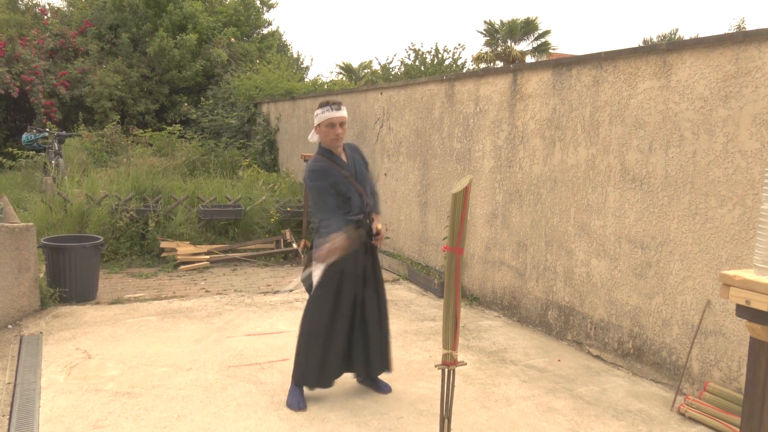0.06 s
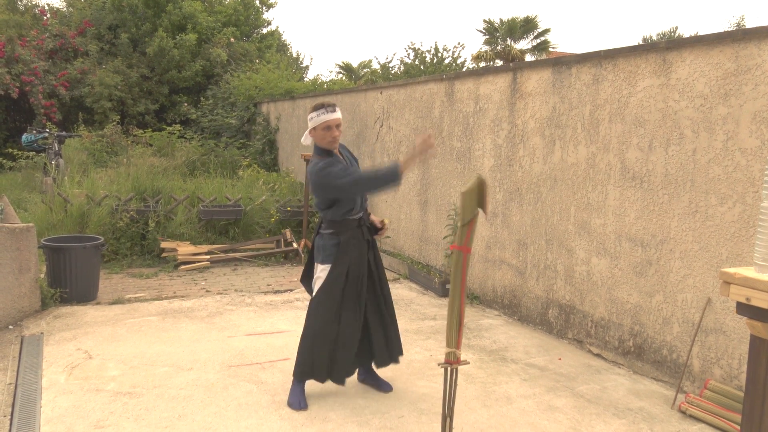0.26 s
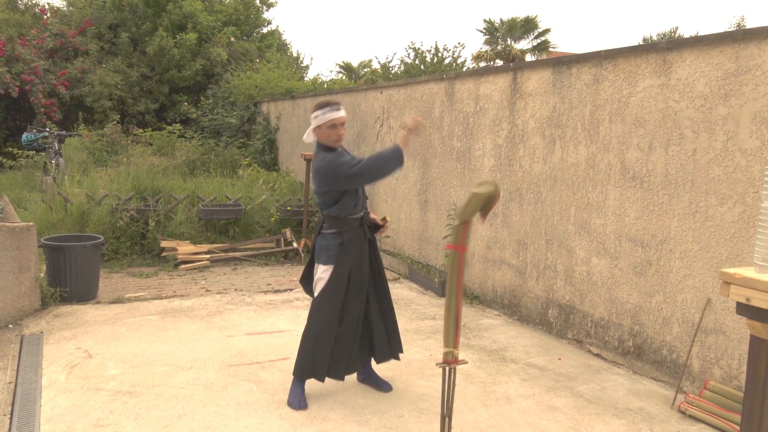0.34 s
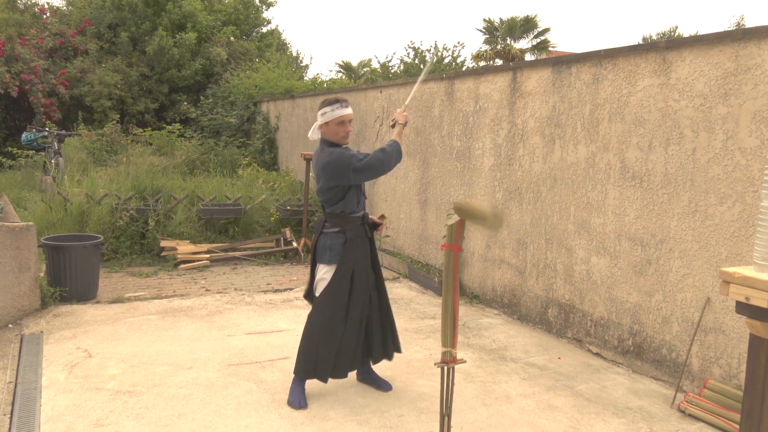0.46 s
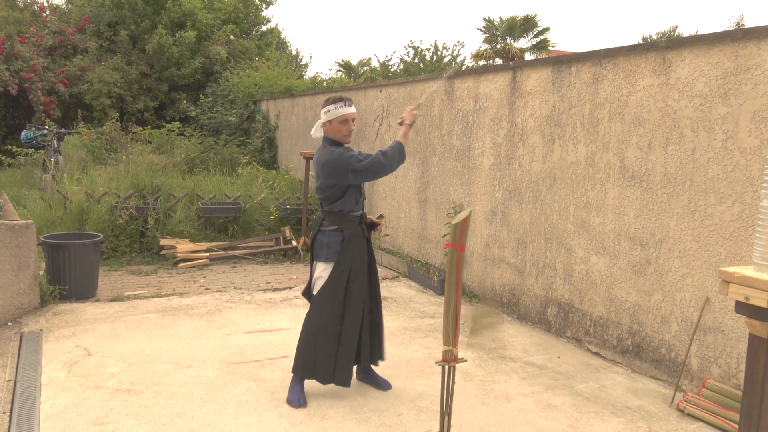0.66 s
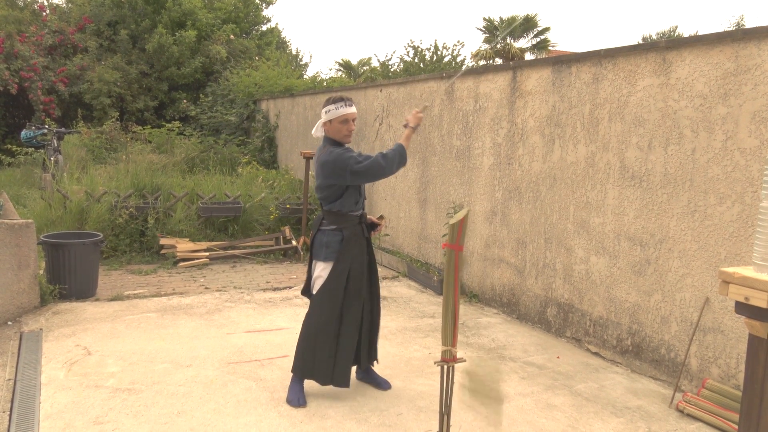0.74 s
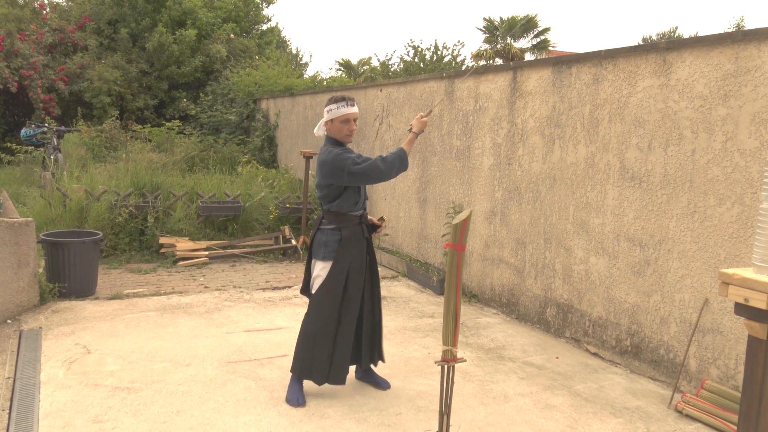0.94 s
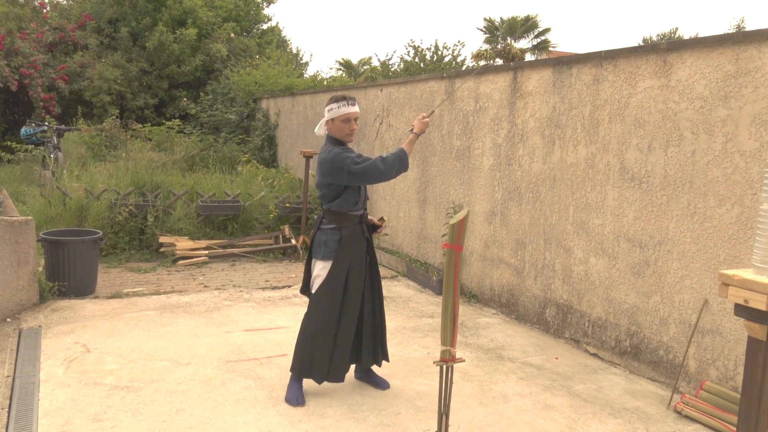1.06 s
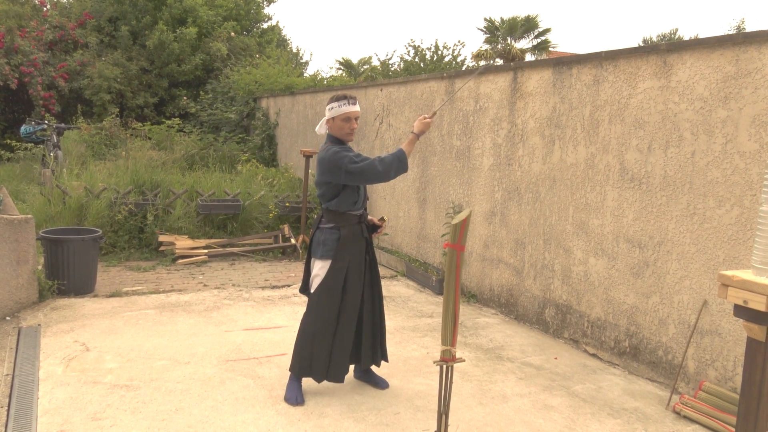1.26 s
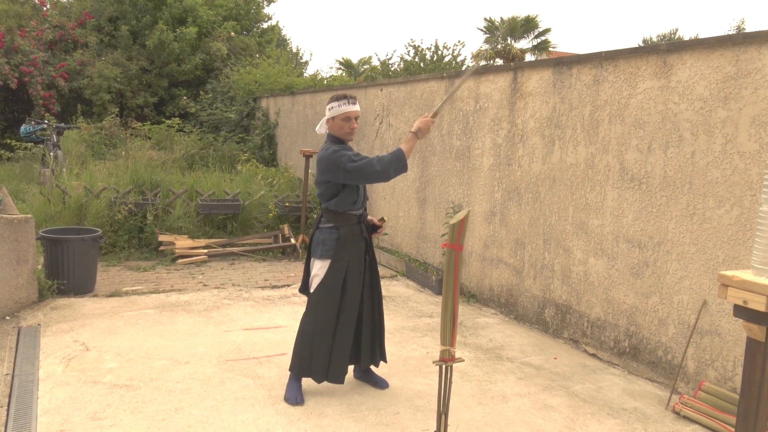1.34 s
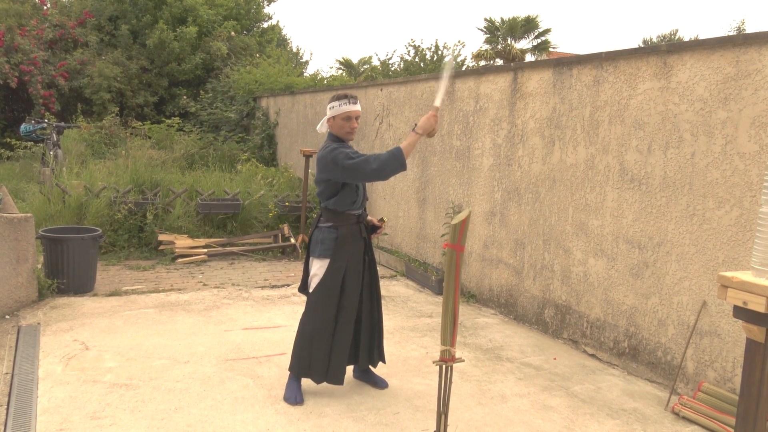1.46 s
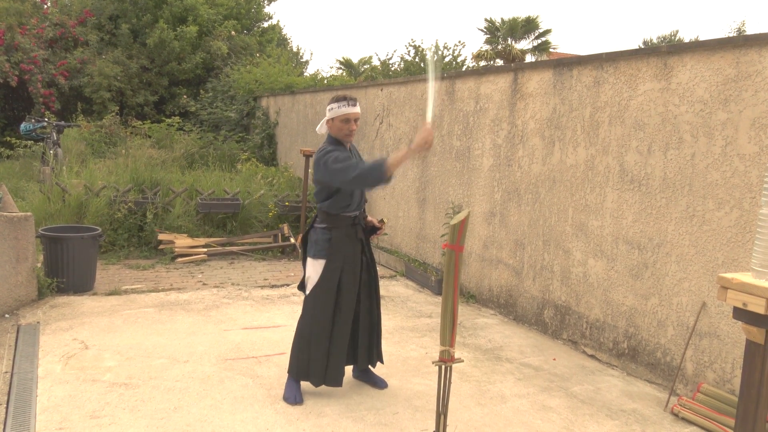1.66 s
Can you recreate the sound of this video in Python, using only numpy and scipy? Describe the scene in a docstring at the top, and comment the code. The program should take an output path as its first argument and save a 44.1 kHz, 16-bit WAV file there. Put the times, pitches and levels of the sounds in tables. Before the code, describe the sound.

A sword swishes briefly and cuts through a bamboo pole with one sharp crack. The severed piece lands on concrete with hollow knocks and a short gritty roll, over faint outdoor noise in a walled yard.

```python
"""A sword cuts bamboo

A blade swishes through the air, splits a standing bamboo pole with one sharp crack and rings thinly.
After a faint tick the cut piece lands on concrete, knocks with its other end, rolls and tips over.
Fracture and impact give broadband noise and excite the damped modes of the hollow bamboo.
The yard's walls reflect each sound over steady outdoor noise and a faint hum."""
import sys
import numpy as np
from scipy import signal
from scipy.fft import rfft, irfft
from scipy.io import wavfile
from scipy.ndimage import uniform_filter1d

SR = 44100
rng = np.random.default_rng(int(sys.argv[2]) if len(sys.argv) > 2 else 0)


def to_wav(sig):
    """Store sig (one row per channel, or 1-D mono) as 16-bit WAV at the path in sys.argv[1].

    Samples outside -1..1 are clipped; the rate is SR.
    """
    pcm = np.clip(np.atleast_2d(sig), -1, 1) * 32767
    pcm = np.round(pcm).astype(np.int16)
    wavfile.write(sys.argv[1], SR, pcm.T)  # frames by channels


N = 74970
T = np.arange(N) / SR

# distant outdoor noise: f/Hz, relative spectral level/dB
OUTDOOR_SPECTRUM = [(25, -21.5), (60, -7), (95, -8), (125, -2), (155, -16), (215, -6), (265, -10),
                    (350, -7), (550, -8.5), (900, -9.5), (1550, -14.5), (2300, -16), (3400, -16.5),
                    (4200, -24), (6300, -27), (9500, -31.5), (12000, -40.5), (16000, -40)]
# faint steady tones: f/Hz, level/dB, bandwidth/Hz
HUM_TONES = [(121, -57, 8.9), (94.1, -61, 8), (215, -62, 11), (1825, -60.5, 17)]
# stages in which the pole gives way: t/s, duration/s, level/dB
FRACTURES = [(0.226, 0.0012, -16), (0.2292, 0.0028, -12.5), (0.2408, 0.00116, -28.5), (0.247, .001, -30.5)]
# tearing fibres: f/Hz, relative spectral level/dB
FIBRE_SPECTRUM = [(60, -38), (160, -18), (280, -1), (480, -5), (850, -2), (1500, -5), (3400, -2.5),
                  (5200, -5), (6700, 0), (9500, -3), (11500, -9.5), (12500, -16.5), (16000, -26)]
# modes of the standing pole: f/Hz, relative level/dB, T60/s
POLE_MODES = [(291, -10.5, 0.048), (344.6, -11.5, 0.08), (583, -14.5, 0.078), (822, -6.5, .035),
              (1080, -13, 0.032), (1360, -12.5, 0.045), (1960, -4.5, 0.019), (2720, -2, .016),
              (2960, -5, .016), (3530, -8, 0.035), (6180, 0, 0.0109), (6560, 7.5, 0.012),
              (8380, -5, 0.0092), (8670, 3, 0.018), (9830, -1.5, 0.0165)]
# ground contacts: t/s, duration/s, level/dB, high-pass f/Hz, low-pass f/Hz, favoured f/Hz, ring level/dB
CONTACTS = [(0.9193, 0.0045, -26.5, 200, 11570, 3000, -24), (0.9251, 0.0059, -24, 302, 10160, 1416, -3),
            (0.9335, 0.0022, -29, 300, 8900, 3330, -5.5), (0.963, 0.0086, -37, 300, 6900, 3560, -3),
            (1.0044, 0.00167, -37.5, 1800, 6500, 2860, -7), (1.0099, 0.0042, -27.5, 1770, 5370, 2140, 2),
            (1.026, 0.00225, -56.5, 2000, 9000, 4600, -17), (1.051, 0.011, -41, 1500, 4500, 3494, -4),
            (1.2025, 0.0058, -37.5, 2000, 10850, 3440, -3.5), (1.2102, 0.0051, -36, 800, 4820, 2900, -11.5)]
# modes of the cut piece, a short hollow tube: f/Hz, relative level/dB, T60/s
TUBE_MODES = [(600, -7, 0.059), (1406.3, -9.5, 0.047), (2100, -5, .024), (2480, -4, .022),
              (2780, -4, 0.019), (3000, -3.5, 0.029), (3450, -6, .02), (4590, 5.5, 0.013),
              (6000, -3.5, 0.021), (6580, -4.5, 0.021), (7320, -2, 0.017), (9200, -15, .017)]
# scraped grit: f/Hz, relative spectral level/dB
GRIT_SPECTRUM = [(80, -14), (300, 1.5), (600, -0.5), (1200, -0.5), (1900, -1), (3200, 1), (5500, -5),
                 (9000, -3.5), (11500, -7.5), (13000, -17), (16000, -19.5)]
# loudness of the rolling: t/s, level/dB
ROLL_ENVELOPE = [(0.94, -43.5), (1.03, -54), (1.11, -42.5), (1.17, -46), (1.24, -46), (1.31, -56.5),
                 (1.45, -50.5)]
# rasp of the rolling: f/Hz, relative spectral level/dB
RASP_SPECTRUM = [(100, -15), (250, 5), (600, -6), (1200, 4.5), (1900, -2.5), (3300, -2), (4500, -10),
                 (9000, -16.5), (12000, -27), (16000, -44)]
# reflections from the walls: delay/s, level/dB
WALL_ECHOES = [(.0095, -14), (.019, -24), (.038, -22), (.056, -24), (.157, -40)]
# reverberation time of the yard: f/Hz, T60/s
YARD_DECAY = [(200, 0.56), (1400, 0.44), (3700, 0.39), (8000, 0.28), (14000, 0.24)]


def amp(db):
    """Amplitude ratio of a level in decibels."""
    return 10 ** (np.asarray(db) / 20)


def unit_rms(x):
    """Power normalisation to rms 1."""
    return x / np.sqrt(np.mean(x ** 2) + 1e-20)


def equal_energy(x):
    """Energy normalisation of a transient to that of 10 ms at rms 1."""
    return x * np.sqrt(.01 * SR / (np.sum(x ** 2) + 1e-20))


def value_at(table, hz):
    """Interpolation on a logarithmic frequency axis."""
    f, value = np.transpose(table)
    return np.interp(np.log(hz + 1), np.log(f + 1), value)


def add(mix, start_s, sound):
    """Superposition of a delayed sound on the mix."""
    part = mix[round(start_s * SR):][:len(sound)]
    part += sound[:len(part)]


def colour(x, spectrum, size=2048):
    """Minimum-phase filtering: the phase is the Hilbert transform of the log gain."""
    log_gain = np.log(amp(value_at(spectrum, abs(np.fft.fftfreq(size, 1 / SR)))))
    taps = np.fft.ifft(np.exp(np.conj(signal.hilbert(log_gain)))).real
    return signal.fftconvolve(x, taps[:size // 2])[:len(x)]


def lowpass(x, hz):
    """Second-order attenuation of the treble."""
    return signal.lfilter(*signal.butter(2, hz, fs=SR), x)


def noise_band(hz, width_hz):
    """Random modulation spreads a steady or gliding carrier into a band of rms 1."""
    f = np.fft.fftfreq(N, 1 / SR)
    noise = rng.standard_normal(N) + 1j * rng.standard_normal(N)
    modulation = np.fft.ifft(np.fft.fft(noise) / (1 + (2 * f / width_hz) ** 2))
    carrier = np.exp(2j * np.pi * np.cumsum(hz * np.ones(N)) / SR)
    return unit_rms((modulation * carrier).real)


def snaps(per_s, size, spread_db=1.9):
    """Shot noise: independent impulses of random sign and uneven strength."""
    strength = amp(spread_db * np.minimum(rng.exponential(1, size), 4))
    return strength * rng.choice([-1., 1.], size) * (rng.random(size) < per_s / SR)


def burst(length_s, per_s=14000, release_s=.0016, size=8192):
    """Dense shot noise that holds, then decays exponentially."""
    t = np.arange(size) / SR
    return snaps(per_s, size) * np.exp(-np.maximum(t - length_s, 0) / release_s)


def ring(modes, contact_s, detune=.012, size=8192):
    """Damped modes build up from rest during contact; little radiates below the lowest one."""
    t = np.arange(size) / SR
    tone = np.zeros(size)
    for hz, db, t60 in modes:
        detuned_hz = hz * (1 + detune * rng.standard_normal())
        tone += amp(db - 60 * t / t60) * np.sin(2 * np.pi * detuned_hz * t)
    build_up = np.minimum(2 * t / contact_s, 1)
    radiation = signal.butter(2, modes[0][0] / 2, "high", fs=SR)
    return equal_energy(signal.lfilter(*radiation, tone * build_up))


def background(noise_db=-45.5, patch_db=.89):
    """Distant noise, modulated in time and frequency; narrow noise bands form a wavering hum."""
    frames = dict(fs=SR, nperseg=1024, noverlap=768)
    spectra = signal.stft(rng.standard_normal(N), **frames)[2]
    patches = uniform_filter1d(rng.standard_normal(spectra.shape), size=12, axis=0)
    patches = unit_rms(uniform_filter1d(patches, size=14, axis=1))
    noise = signal.istft(spectra * amp(patch_db * patches), **frames)[1][:N]
    gain = amp(value_at(OUTDOOR_SPECTRUM, np.fft.rfftfreq(N, 1 / SR)))
    outdoors = unit_rms(irfft(rfft(noise) * gain, N))
    hum = sum(amp(db) * noise_band(hz, width_hz) for hz, db, width_hz in HUM_TONES)
    return amp(noise_db) * outdoors + hum


def swish(peak_s=.186, rise_s=.025, fall_s=.011, peak_db=-42.5, glide_hz_per_s=6930):
    """Aerodynamic noise of the moving blade: a rising whistle within a broad rush of air."""
    t = T - peak_s
    whistle = noise_band(hz=1050 + glide_hz_per_s * np.clip(t, -.1, .1), width_hz=460)
    rush = amp(-11.5) * noise_band(hz=2765, width_hz=5000)
    envelope = np.exp(-(t / np.where(t < 0, rise_s, fall_s)) ** 2)
    return amp(peak_db) * envelope * (whistle + rush)


def crack(ring_shift_db):
    """Fracture of the near wall, then the far wall, tears fibres and excites the pole's modes."""
    out = np.zeros(N)
    for start_s, length_s, db in FRACTURES:
        fibres = amp(-1) * equal_energy(colour(burst(length_s), FIBRE_SPECTRUM))
        pole = amp(-7 + ring_shift_db) * ring(POLE_MODES, length_s)
        add(out, start_s, amp(db) * (fibres + pole))
    return out


def blade_ring(hz=14060, glide_hz_per_s=3000, t60=.21, rise_s=.055):
    """Free vibration after the cut: one thin tone that glides up as the blade swings on."""
    t = T[:SR // 2]
    envelope = amp(-35 - 60 * t / t60) * np.minimum(t / rise_s, 1) ** 2
    phase = 2 * np.pi * (hz + glide_hz_per_s * t / 2) * t
    out = np.zeros(N)
    add(out, FRACTURES[0][0], envelope * np.sin(phase))
    return out


def tick(start_s=.7445, length_s=.013, db=-46.5):
    """A brief noise transient, heard as a faint tick while the piece falls."""
    click = lowpass(colour(burst(length_s), GRIT_SPECTRUM), hz=5000)
    out = np.zeros(N)
    add(out, start_s, amp(db) * equal_energy(click))
    return out


def knocks(ring_shift_db, favour_db=14.5, favour_octaves=.091):
    """Impact excitation: each contact scrapes grit and rings the modes its position favours."""
    out = np.zeros(N)
    for start_s, length_s, db, highpass_hz, lowpass_hz, favoured_hz, ring_db in CONTACTS:
        modes = []
        for hz, mode_db, t60 in TUBE_MODES:
            closeness = np.exp(-(np.log2(hz / favoured_hz) / favour_octaves) ** 2)
            modes.append((hz, mode_db + favour_db * closeness, t60))
        scrape = equal_energy(colour(burst(length_s), GRIT_SPECTRUM))
        tube = amp(ring_db + ring_shift_db) * ring(modes, length_s)
        bass_cut = signal.butter(1, highpass_hz, "high", fs=SR)  # light contacts carry little bass
        knock = lowpass(signal.lfilter(*bass_cut, scrape + tube), lowpass_hz)
        add(out, start_s, amp(db) * equal_energy(knock))
    return out


def roll(grains_per_s=6000, ring_db=-11):
    """Roughness excitation: tiny impacts on grit rasp and drive the modes of the rolling tube."""
    grains = snaps(grains_per_s, N)
    rasp = unit_rms(colour(grains, RASP_SPECTRUM))
    tube = unit_rms(signal.fftconvolve(grains, ring(TUBE_MODES, contact_s=.00054))[:N])
    envelope = amp(np.interp(T, *np.transpose(ROLL_ENVELOPE), left=-120, right=-120))
    return envelope * unit_rms(rasp + amp(ring_db) * tube)


def yard_reflections(x, tail_db=-11, rise_s=.0025, smear_s=.0036):
    """Scattering by rough walls: smeared echoes and a diffuse tail whose treble decays first."""
    t = T[:SR // 2]
    hz, frame_s, spectra = signal.stft(rng.standard_normal(len(t)), SR, nperseg=256)
    decay = amp(-60 * frame_s / value_at(YARD_DECAY, hz)[:, None])
    tail = signal.istft(spectra * decay, SR, nperseg=256)[1][:len(t)]
    tail *= 1 - np.exp(-t / rise_s)
    response = amp(tail_db) * tail / np.linalg.norm(tail)
    for delay_s, db in WALL_ECHOES:
        echo = lowpass(rng.standard_normal(len(t)) * np.exp(-t / smear_s), hz=10000)
        add(response, delay_s, amp(db) * echo / np.linalg.norm(echo))
    return signal.fftconvolve(x, response)[:N]


def scene(scattered_ring_db=-8):
    """Direct and reflected sound superpose; the hits send more crackle than ring to the walls."""
    quiet_sounds = swish() + blade_ring() + roll() + tick()
    direct = crack(ring_shift_db=0) + knocks(ring_shift_db=0) + quiet_sounds
    scattered = crack(scattered_ring_db) + knocks(scattered_ring_db) + quiet_sounds
    return (direct + yard_reflections(scattered) + background())[None]


def record(dry, ceiling=.85, edge_hz=16000):
    """Soft saturation rounds the peaks of the crack; a low-pass limits the bandwidth."""
    saturated = dry / (1 + (dry / ceiling) ** 6) ** (1 / 6)
    taps = signal.firwin(255, edge_hz, window=("kaiser", 8), fs=SR)
    return signal.oaconvolve(saturated, taps[None], "same")


dry = scene()
out = record(dry)
to_wav(out)
```